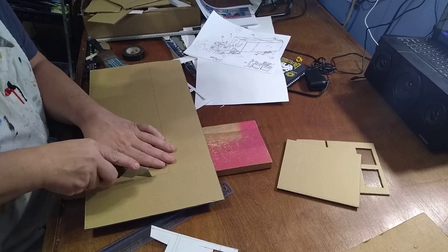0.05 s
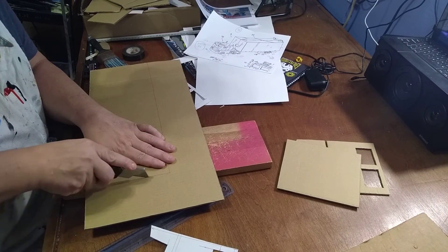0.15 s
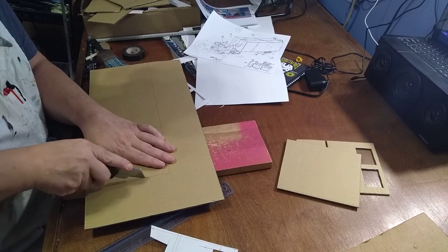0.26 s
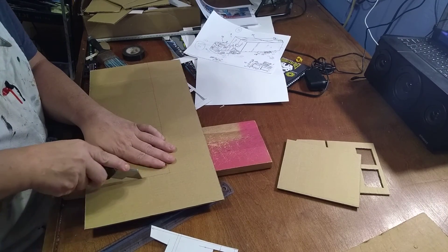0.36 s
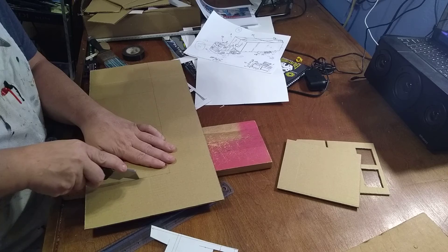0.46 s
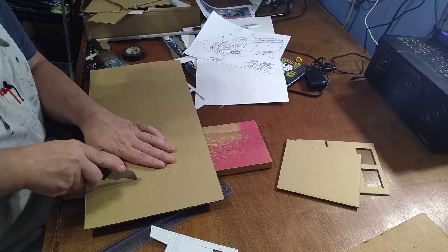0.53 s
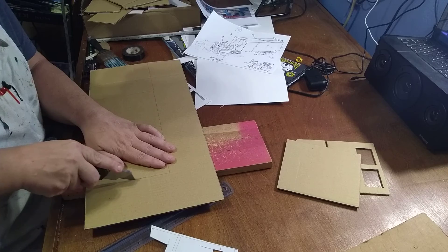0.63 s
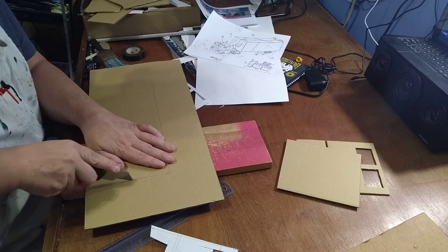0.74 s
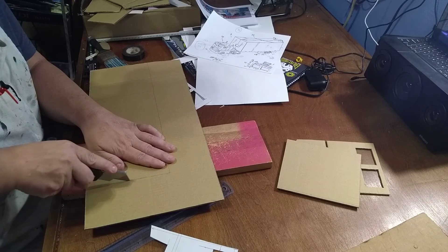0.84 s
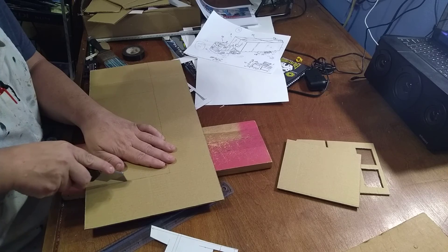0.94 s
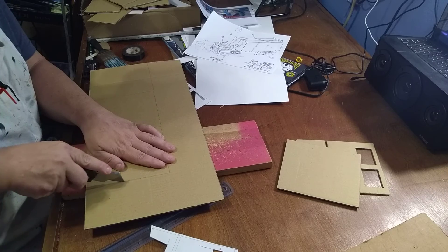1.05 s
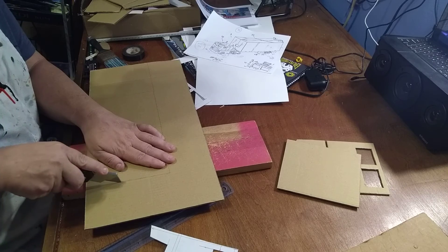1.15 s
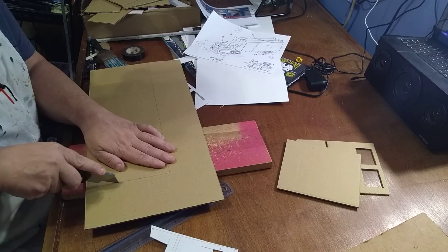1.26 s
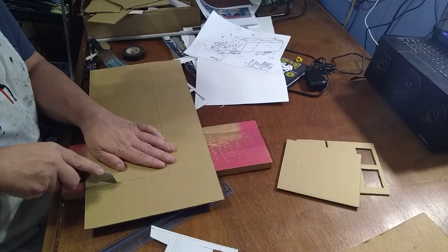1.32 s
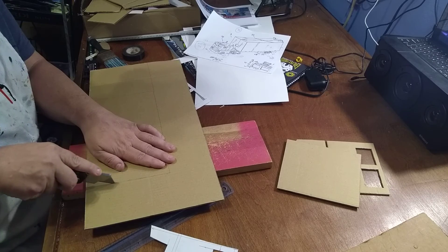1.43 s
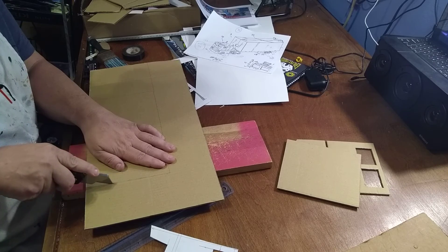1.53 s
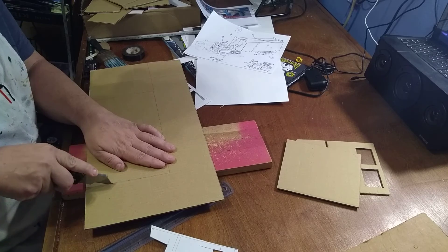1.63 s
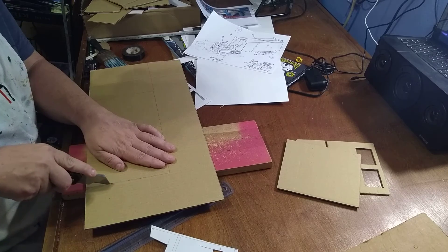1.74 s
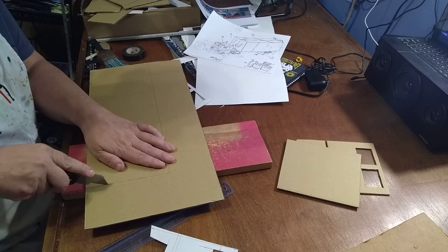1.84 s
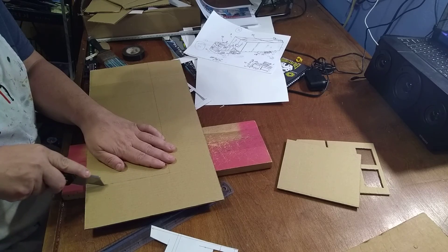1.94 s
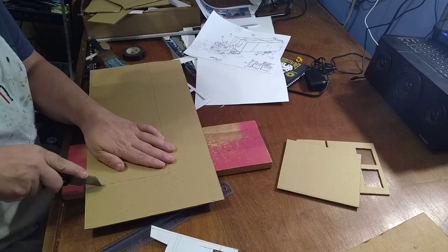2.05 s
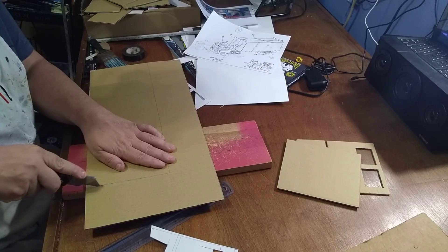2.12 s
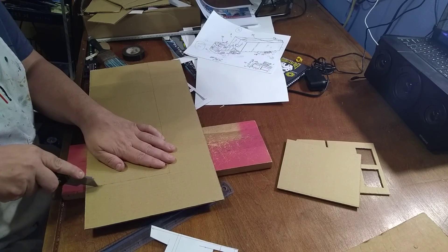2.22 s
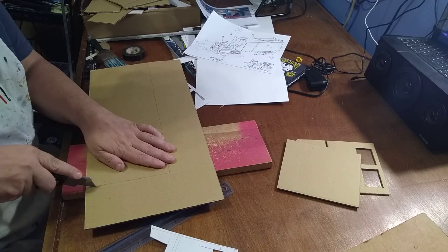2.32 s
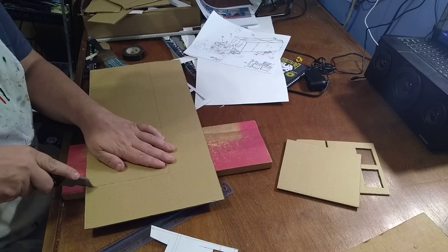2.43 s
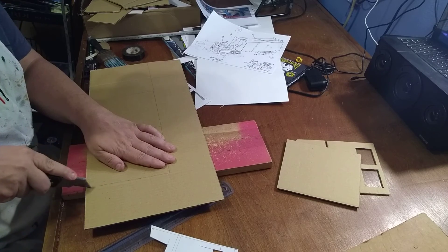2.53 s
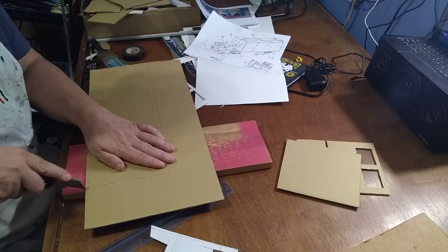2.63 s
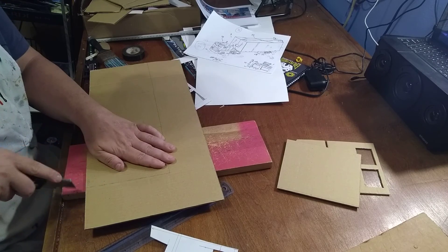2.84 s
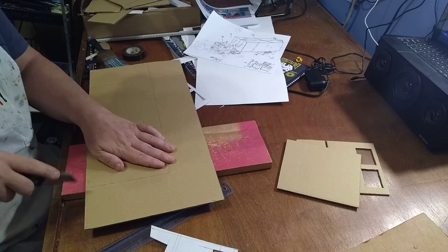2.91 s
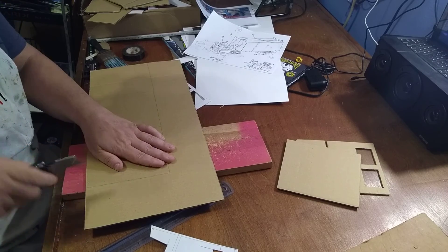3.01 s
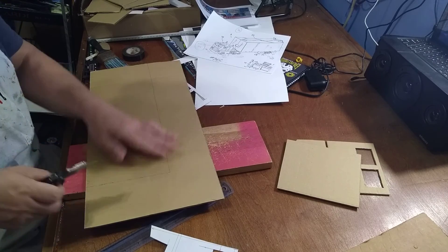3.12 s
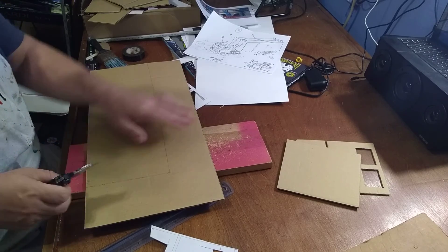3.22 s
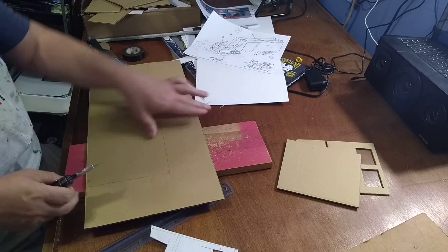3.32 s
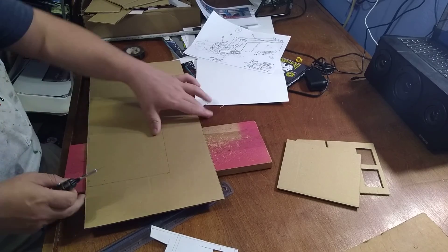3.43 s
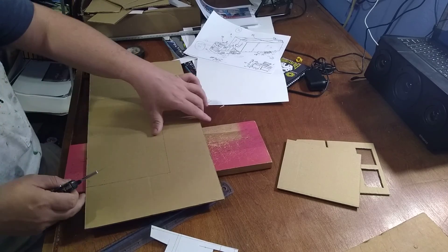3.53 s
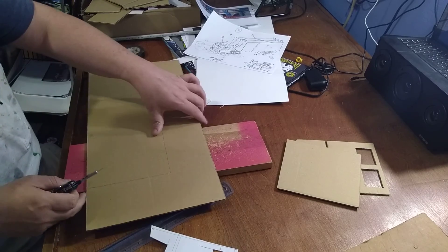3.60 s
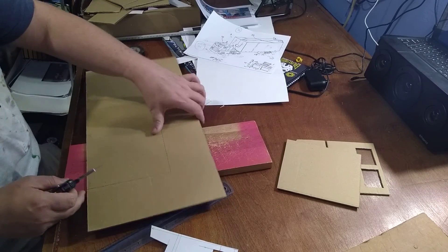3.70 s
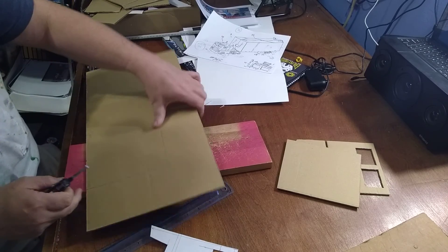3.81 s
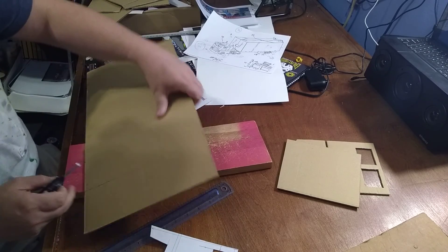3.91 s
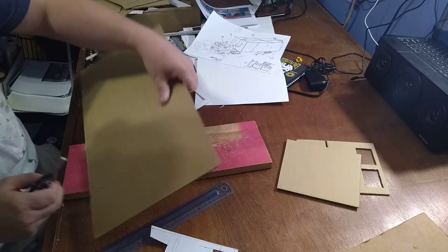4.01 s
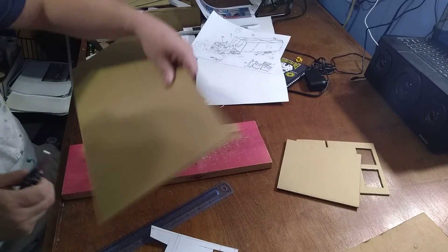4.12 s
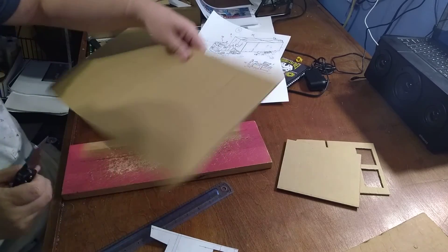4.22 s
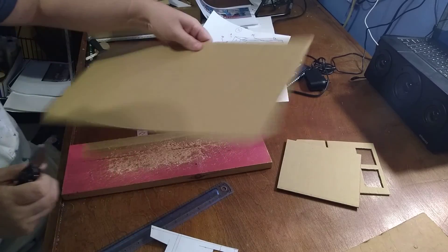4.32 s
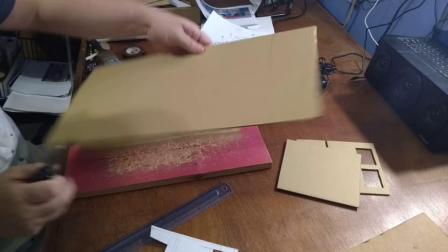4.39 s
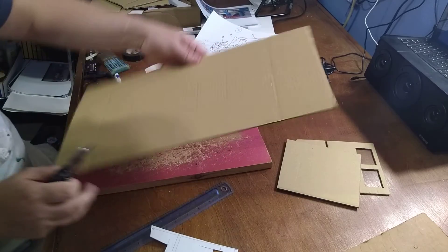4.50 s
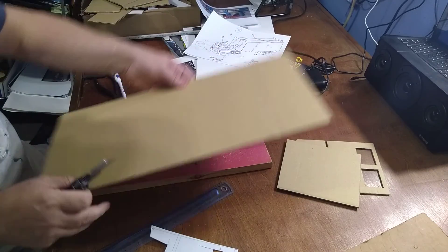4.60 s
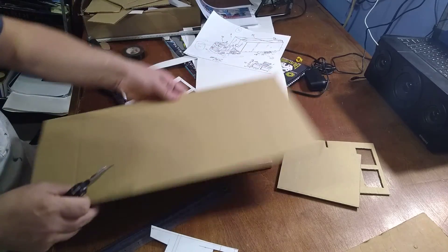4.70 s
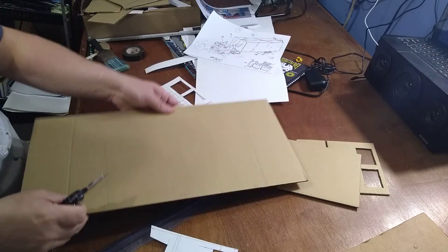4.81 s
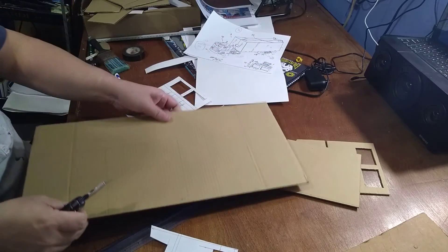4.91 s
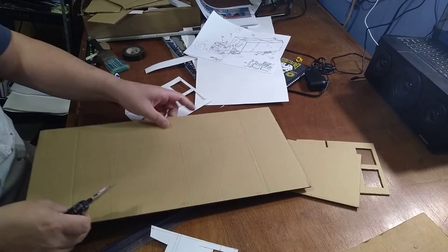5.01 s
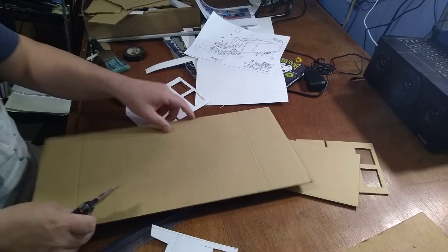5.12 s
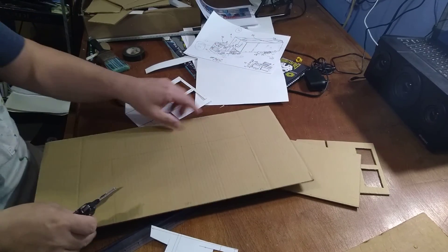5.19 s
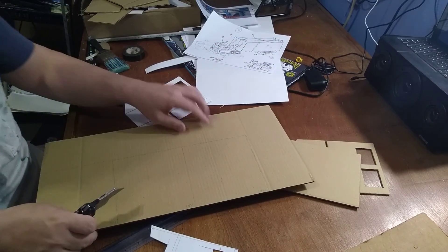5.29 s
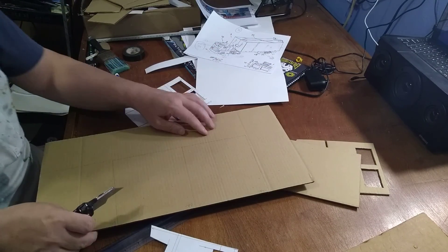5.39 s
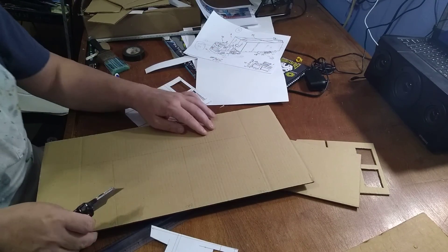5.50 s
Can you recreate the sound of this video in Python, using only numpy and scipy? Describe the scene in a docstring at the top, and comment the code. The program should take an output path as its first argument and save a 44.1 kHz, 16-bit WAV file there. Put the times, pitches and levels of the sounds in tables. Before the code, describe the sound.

A steady low fan noise with faint hum lies under everything in a small, briefly reverberant room, heard closely in wide phone stereo. From 0 to about 2.65 s a utility knife pulls through corrugated cardboard: a continuous dry rasp of snapping fibres, boxy midrange from the sheet, bright tearing hiss and a thin high blade ring, with uneven stick-slip effort, swelling near 1.9 s and again at the end. At 2.8 s the knife drops off the edge with small taps and a faint desk thud. Soft rubbing and ticks follow from 3.0 to 3.9 s; around 3.97 s the sheet is lifted with a stronger swish and knock. A scrape fades from 4.15 s, then scuffs, clustered hollow knocks and a crisp click come at 4.65-4.8 s. At 5.0 s the sheet lands with by far the loudest sound, a sharp flat crack and short boom, then small taps near 5.2 s and a faint slide at 5.55 s.

```python
"""Utility knife cutting cardboard

One long cut through a corrugated sheet on a desk: random fibre snaps drive sheet rasp, hiss and blade ring.
The knife drops off the edge; a hand slides over the sheet (shaped grain), picks it up, turns it and lays
it down with a sharp tap (push, tick, decaying modes, crunch; the desk booms as filtered noise).
Small room with changing noise tails, fan of air noise and hum sines, phone with a widened stereo image."""
import sys
import numpy as np
from scipy import signal
from scipy.fft import rfft, irfft
from scipy.io import wavfile
from scipy.ndimage import uniform_filter1d, map_coordinates

SR = 44100
rng = np.random.default_rng(int(sys.argv[2]) if len(sys.argv) > 2 else 0)


def inscribe(sig):
    """Save sig as 16-bit PCM at rate SR to the path in sys.argv[1].

    A 1-D sig is mono; a 2-D sig holds one channel per row.
    Samples are clipped to [-1, 1] before scaling.
    """
    pcm = np.round(np.clip(np.atleast_2d(sig).T, -1, 1) * 32767)
    wavfile.write(sys.argv[1], SR, pcm.astype(np.int16))


N = 244755

# modes of the free sheet: (frequency [Hz], relative level [dB], t60 [s])
SHEET_MODES = [(139.5, -24, 0.41), (224, -14.5, 0.24), (302, -33, 0.14), (371.7, -7, 0.16),
               (414, -8.5, 0.18), (469, -14, 0.14), (490, -12, 0.097), (601.7, 3.5, 0.1),
               (694, -2.5, 0.062), (828, -2.5, 0.077), (935, -5.5, 0.16), (1014, -5.5, 0.051),
               (1222, -1.5, 0.046), (1360, -12, 0.24), (1700, -19, 0.19)]
# colour of sliding hiss and dry ticks: (frequency [Hz], relative level [dB])
SWISH_COLOUR = [(600, -39), (2000, 24), (3500, 13), (5500, 11), (7500, 18.5), (10000, 20.5), (12300, 24.5),
                (13800, 20), (14500, 2.5)]


def amp(db):
    """Decibels to gain."""
    return 10 ** (np.asarray(db) / 20)


def unit(x):
    """x at rms 1."""
    return x / np.sqrt(np.mean(x ** 2) + 1e-20)


def along(points, hz):
    """(Hz, value) points read on a log frequency axis."""
    f, v = np.transpose(points)
    return np.interp(np.log(hz + 1), np.log(f), v)


def fade(t, t60):
    """Exponential decay, 60 dB in t60 seconds."""
    return np.exp(-np.log(1000) * t / t60)


def bell(hz, centre, width):
    """Resonance curve: 1 at its centre, 1/2 at the edges of its width."""
    return 1 / (1 + (2 * (hz - centre) / width) ** 2)


def wobble(rate):
    """Smooth random curve, rate knots a second."""
    knots = rng.standard_normal(int(N * rate / SR) + 4)
    return map_coordinates(knots, [np.arange(N) * rate / SR])


def shaped(x, gain):
    """x through the causal, minimum-phase filter with this gain over frequency."""
    size = 4096
    log_gain = np.log(np.maximum(gain(np.fft.rfftfreq(size, 1 / SR)), 1e-6))
    cepstrum = irfft(log_gain)
    # fold the cepstrum onto positive time: minimum phase
    cepstrum[1:size // 2] *= 2
    cepstrum[size // 2 + 1:] = 0
    impulse = irfft(np.exp(rfft(cepstrum)))
    return signal.fftconvolve(x, impulse[None], axes=1)[:, :x.shape[1]]


def coloured(x, spectrum):
    """x with the colour of (Hz, dB) points."""
    return shaped(x, lambda hz: amp(along(spectrum, hz)))


def patchy(x, depth_db):
    """Narrow bands flare and fade for a few hundredths of a second, alike on both paths."""
    z = signal.stft(x, nperseg=512)[2]
    field = rng.standard_normal(z.shape[1:])
    field = uniform_filter1d(field, size=4, axis=0)  # over frequency
    field = uniform_filter1d(field, size=7, axis=1)  # over time
    return signal.istft(z * amp(depth_db * unit(field)), nperseg=512)[1][:, :N]


def add(track, s, sound):
    """Mixes a sound into a track at time s."""
    part = track[:, round(s * SR):][:, :sound.shape[1]]
    part += sound[:, :part.shape[1]]


def fan():
    """Steady air noise with hum lines of fan and mains that waver in level and phase."""
    # hum lines: (frequency [Hz], rms level before wavering [dB])
    hum_lines = [(63, -60.5), (120, -63), (208, -69.5), (360, -60.5), (479, -61.5), (955, -65.5)]
    # air colour: (frequency [Hz], relative level [dB])
    air_colour = [(25, 1.5), (65, -1.5), (130, -6.5), (250, -4.5), (400, -6), (700, -10.5), (1000, -11.5),
                  (1600, -13.5), (3000, -15.5), (6000, -18.5), (9000, -23.5), (12300, -21.5),
                  (14500, -29.5)]
    air_db, hum_waver_db, phase_waver_rad = -49, 2.2, 1.27
    t = np.arange(N) / SR
    hum = 0
    for hz, db in hum_lines:
        level = amp(db + hum_waver_db * wobble(5.67)) * np.sqrt(2)
        phase = phase_waver_rad * np.array([wobble(7), wobble(7)])
        hum = hum + level * np.sin(2 * np.pi * hz * t + phase)
    air = patchy(rng.standard_normal((2, N)), depth_db=3)
    return hum + amp(air_db) * unit(coloured(air, air_colour))


def room(x):
    """Walls answer after 5 ms, treble dies first; moving arms and sheet keep changing the echo paths."""
    # reverberation: (frequency [Hz], t60 [s])
    reverb_t60 = [(150, 0.37), (600, 0.43), (3000, 0.32), (12000, 0.22)]
    delay_s = 0.005
    hz, t, z = signal.stft(rng.standard_normal((4, 2, SR // 2)), SR, nperseg=256)
    decay = fade(t, along(reverb_t60, hz)[:, None])
    tails = signal.istft(z * decay, SR, nperseg=256)[1]
    tails = tails / np.linalg.norm(tails[0, 0])
    tails = np.pad(tails, ((0, 0), (0, 0), (round(delay_s * SR), 0)))
    # drifting mix of four tails at constant total power
    shares = np.array([wobble(1.957) for _ in tails])
    shares /= np.linalg.norm(shares, axis=0)
    echoes = signal.fftconvolve(x[None], tails, axes=2)[..., :N]
    return (shares[:, None] * echoes).sum(0)


def thump():
    """Desk booms briefly: low noise that swells and decays."""
    # knife drops off, sheet is tipped, sheet lands: (time [s], level before the envelope [dB])
    desk_hits = [(2.835, -52), (3.965, -52), (4.9988, -40)]
    # boom colour: (frequency [Hz], relative level [dB])
    boom_colour = [(25, -21), (65, -8), (140, -3), (230, -9), (500, -13), (2000, -75)]
    t = np.arange(N) / SR
    boom = 0
    for s, db in desk_hits:
        since = np.maximum(t - s, 0)
        boom = boom + amp(db) * (1 - fade(since, 0.05)) * fade(since, 0.77)
    return boom * unit(coloured(rng.standard_normal((2, N)), boom_colour))


def snaps(rate):
    """Fibres breaking at random moments and sizes, each reaching the two sound paths differently."""
    breaks = rng.random(N) < rate / SR
    return unit(breaks * rng.standard_normal((2, N)))


def grain():
    """Dense stream of fine fibres plus the crackle of coarser bundles."""
    bundles_per_s, bundle_db = 300, -6  # level against the fine grain
    return snaps(rate=14000) + amp(bundle_db) * snaps(rate=bundles_per_s)


def handling():
    """Skin and desk rub the sheet: smooth slides, and short scrapes that swell and die."""
    # slides: (peak time [s], half width at 1/e [s], sheet rasp [dB], hiss [dB])
    slides = [(2.73, 0.098, -47, -66), (3.06, 0.092, -54, -47), (3.6, 0.15, -51, -54),
              (3.805, 0.035, -42.5, -55), (3.94, 0.11, -42.5, -39), (3.976, 0.041, -33.5, -35),
              (4.32, 0.23, -53.5, -46), (4.57, 0.061, -49, -56.5), (4.89, 0.026, -51, -45),
              (4.965, 0.051, -43.5, -41.5), (5.55, .05, -53.5, -51.5)]
    # scrapes: (time [s], t60 [s], sheet rasp [dB], hiss [dB])
    scuffs = [(2.832, 0.2, -41, -67), (3.067, 0.38, -47, -53), (3.142, 0.071, -42.5, -47),
              (3.358, 0.31, -55, -43.5), (3.707, 0.09, -41.5, -37), (3.853, 0.088, -51, -52),
              (4.158, 0.69, -52.5, -42.5), (4.643, 0.14, -34.5, -35.5), (4.756, 0.13, -35, -39),
              (5.152, 0.052, -44, -54), (5.32, 1, -64, -56)]
    # colour of the rubbed sheet: (frequency [Hz], relative level [dB])
    rub_colour = [(50, -55), (150, -16), (300, 2.5), (450, -1.5), (620, 1), (800, 5), (1000, 5), (1300, 2),
                  (1900, 2.5), (3000, -3), (5000, -2.5), (9000, -10.5)]
    scuff_rise_s, rub_flutter_db = 0.02, 1.3
    t = np.arange(N) / SR
    strokes = []
    for s, width_s, rasp_db, hiss_db in slides:
        strokes.append((np.exp(-((t - s) / width_s) ** 2), rasp_db, hiss_db))
    for s, t60, rasp_db, hiss_db in scuffs:
        rise = np.sqrt(np.clip((t - s) / scuff_rise_s, 0, 1))
        decay = fade(np.maximum(t - s - scuff_rise_s, 0), t60)
        strokes.append((rise * decay, rasp_db, hiss_db))
    # overlapping strokes add in power
    rasp = np.sqrt(sum((amp(db) * stroke) ** 2 for stroke, db, _ in strokes))
    hiss = np.sqrt(sum((amp(db) * stroke) ** 2 for stroke, _, db in strokes))
    fibres = patchy(grain() * amp(rub_flutter_db * wobble(80)), depth_db=3.5)
    lift_db, width_hz = 8, 40  # rubbing also stirs the sheet modes; lift scales with mode level

    def mode_gain(hz):
        return amp(lift_db * sum(amp(db / 2) * bell(hz, f, width_hz) for f, db, _ in SHEET_MODES))

    sheet = unit(coloured(shaped(fibres, mode_gain), rub_colour))
    return rasp * sheet + hiss * unit(coloured(fibres, SWISH_COLOUR))


def levelled(x):
    """x with each path at rms 1 over its first 25 ms."""
    start = x[:, :np.count_nonzero(np.arange(x.shape[1]) / SR < .025)]
    return x / np.sqrt(np.mean(start ** 2, axis=1, keepdims=True))


def knocks():
    """Contact: sharp push, dry tick, brief sheet ring, crunch of the flexing liner; click: tick alone."""
    # contacts of knife, fingers and sheet, levels relative: (time [s], sheet ring [dB], sharp push [dB],
    # brightness of the ring [dB per octave], frequency the contact point favours [Hz])
    contacts = [(0.281, -42, -42, -0.5, 1010), (2.630, -38, -52, 5, 1110), (2.646, -35.5, -41, 0, 436),
                (2.700, -41.5, -48, -9.5, 450), (2.835, -38.5, -34, -2.5, 520), (2.8445, -48, -36, 7, 950),
                (2.852, -45.5, -26, 3, 705), (3.0325, -46.5, -33, 12.5, 1450),
                (3.076, -45.5, -32, 17, 3160), (3.158, -45, -47, 5, 1570), (3.7015, -40, -33, 3.5, 1060),
                (3.722, -41, -36, 0.5, 1222), (3.868, -40, -46, -0.5, 1222), (3.972, -34, -24, -1, 890),
                (3.987, -41.5, -21, 7, 1100), (4.428, -49.5, -52, 7.5, 1222), (4.649, -34.5, -41, 0.5, 920),
                (4.661, -35.5, -36, 3, 1000), (4.671, -36, -38, 0, 1400), (4.680, -33, -31, 1.5, 420),
                (4.692, -35.5, -31, -0.5, 577), (4.769, -38, -40, -1, 650), (4.777, -38.5, -44, -2.5, 1000),
                (4.799, -38, -45, 3.5, 1030), (4.948, -45, -45, 9, 1222), (4.9987, -29.5, 1.8, 4.5, 1222),
                (5.006, -26.5, -25, -1, 550), (5.045, -39.5, -40, 0, 1390), (5.1694, -39.5, -40, 1.5, 800),
                (5.188, -39.5, -45, -5, 554), (5.2238, -41, -28.5, 2.5, 1550), (5.231, -38.5, -36, -5, 434)]
    # a hard edge or fingernail catches: (time [s], level [dB])
    clicks = [(0.248, -30), (2.883, -33), (3.033, -40.5), (3.702, -26), (4.16, -34), (4.6615, -15)]
    # colours of push and crunch: (frequency [Hz], relative level [dB])
    push_colour = [(60, -29), (300, -5), (700, 1.5), (1300, 1.5), (2000, 7), (3000, 1.5), (4200, -6.5),
                   (5500, -10.5), (8000, -47), (14000, -23)]
    crunch_colour = [(80, -38), (350, 4), (1400, -1), (3500, -13), (6500, -40.5)]
    ring_attack_t60_s = 0.0043  # cardboard gives way before it rings
    tick_db, crunch_db = -10, -1.5  # against the ring
    tick_t60_s, crunch_t60_s = 0.016, 0.059
    favour_db, favour_octaves = 10.5, 0.29  # lift of the favoured modes and its width
    track, t = np.zeros((2, N)), np.arange(SR // 2) / SR
    push = coloured(np.array([t == 0], float), push_colour)
    push = push / np.abs(push).max() * [[1.3], [-.25]]  # mostly from straight ahead

    def burst(spectrum):
        return unit(coloured(rng.standard_normal((2, len(t))), spectrum))

    def tick():
        return burst(SWISH_COLOUR) * fade(t, tick_t60_s)

    hz, level_db, t60 = np.transpose(SHEET_MODES)[:, :, None]
    for s, ring_db, push_db, tilt_db, favoured_hz in contacts:
        def contact_db(f):
            favour = favour_db * bell(np.log2(f), np.log2(favoured_hz), favour_octaves)
            return favour + tilt_db * np.log2(f / favoured_hz)

        strength = amp(level_db + contact_db(hz) + 2 * rng.standard_normal((2, len(SHEET_MODES), 1)))
        phase = 2 * np.pi * rng.random((2, len(SHEET_MODES), 1))
        bent_hz = hz * (1 + 0.0077 * rng.standard_normal(hz.shape))  # grip and bending shift the modes
        ring = (strength * np.sin(2 * np.pi * bent_hz * t + phase) * fade(t, t60)).sum(1)
        crunch = shaped(burst(crunch_colour), lambda f: amp(contact_db(np.clip(f, 150, 4000))))
        crunch = crunch * fade(t, crunch_t60_s)
        body = levelled(ring) + amp(crunch_db) * levelled(crunch)
        body = levelled(body * (1 - fade(t, ring_attack_t60_s)))
        add(track, s, amp(push_db) * push + amp(ring_db) * (body + amp(tick_db) * tick()))
    for s, db in clicks:
        add(track, s, amp(db) * tick())
    # contacts carry no deep bass
    return signal.sosfilt(signal.butter(2, 90, "highpass", fs=SR, output="sos"), track)


def pressed(x):
    """The held sheet's resonances drift between slacker and tauter as the hand's pressure changes."""
    # resonances of the pressed sheet: (centre before shift [Hz], width [Hz], lift [dB])
    held_modes = [(216, 43, 7), (379, 50, 14), (421, 19, 6), (461, 32, 9), (620, 61, 2), (960, 18, 9),
                  (1202, 76, 11.5), (1336, 23, 8.5), (1443, 59, 3.5), (1575, 97, 6.5)]
    shift, shifts_per_s = 0.028, 7.7  # frequency fraction either way; random knots a second

    def state(ratio):
        return shaped(x, lambda hz: amp(sum(db * bell(hz, ratio * f, w) for f, w, db in held_modes)))

    taut = (1 + np.tanh(2 * wobble(shifts_per_s))) / 2
    return (1 - taut) * state(1 - shift) + taut * state(1 + shift)


def cut():
    """Snapping fibres shake the sheet, hiss and ring the thin blade; hiss and ring follow effort."""
    # pull of the blade through the sheet: (time [s], effort [dB])
    effort_points = [(0.0, -43), (0.135, -43), (0.16, -39.5), (0.29, -38), (0.43, -42), (.66, -39.5),
                     (.71, -45), (.76, -40), (1.03, -37), (1.12, -41.5), (1.53, -39.5), (1.61, -48),
                     (1.84, -43), (1.91, -32.5), (2.02, -37.5), (2.085, -50), (2.1, -43.5), (2.44, -37),
                     (2.53, -43), (2.57, -33.5), (2.62, -36), (2.63, -30), (2.69, -80), (2.76, -71)]
    # shaking of the sheet under the blade: (time [s], level [dB])
    shaking = [(0.01, -42), (0.13, -45), (0.26, -41.5), (0.55, -43.5), (0.64, -40.5), (0.7, -43.5),
               (0.98, -38), (1.11, -41), (1.56, -40.5), (1.59, -47), (1.96, -37), (2.1, -43), (2.24, -43),
               (2.26, -40), (2.53, -44), (2.56, -39), (2.63, -37.5)]
    # blade breaks through tougher spots: (time [s], extra force [dB])
    snags = [(0.247, 4), (2.011, 1), (2.097, 5), (2.263, 6)]
    # colours of sheet and tearing: (frequency [Hz], relative level [dB])
    rasp_colour = [(40, -32), (130, -7), (290, -6.5), (390, -4.5), (650, 2.1), (830, -4.5), (1080, -7.5),
                   (1300, -3), (1700, -1), (2200, -8), (3200, -8), (6000, -54)]
    fibre_colour = [(500, -45), (2000, -14), (3200, -3), (4300, 7.5), (5800, 5), (7500, 7), (9000, 4.5),
                    (11000, 12.5), (13000, 13.5), (14300, -6)]
    cut_s, rasp_release_t60_s, snag_t60_s = 2.61, 0.25, 0.08
    usual_effort_db = -40
    hiss_base_db, hiss_growth = -38.5, 1  # level at usual effort; dB per dB of effort
    blade_base_db, blade_growth = -46.5, 0.74  # likewise, at mid-cut
    blade_rise_db_per_s, blade_flutter_db = 3.5, 4
    dull_s, dull_width_s, dull_depth_db = 1.69, 0.21, -37  # a stretch where the blade sings less
    catches_per_s, catch_db = 55, 1.3  # stick-slip: centre of a wandering rate; depth
    blade_hz, blade_width_hz = 12250, 1100

    t = np.arange(N) / SR
    effort_db = np.interp(t, *np.transpose(effort_points), right=-200) - usual_effort_db
    release = fade(np.maximum(t - cut_s, 0), rasp_release_t60_s)
    rasp = amp(np.interp(t, *np.transpose(shaking))) * release
    hiss = amp(hiss_base_db + hiss_growth * effort_db)
    dull_db = dull_depth_db * np.exp(-((t - dull_s) / dull_width_s) ** 2)
    ring_db = blade_base_db + blade_growth * effort_db + blade_rise_db_per_s * (t - cut_s / 2)
    ring = amp(ring_db + dull_db + blade_flutter_db * wobble(90))
    snag = amp(sum(db * (t >= s) * fade(np.abs(t - s), snag_t60_s) for s, db in snags))

    catch_cycles = np.cumsum(catches_per_s * amp(2.01 * wobble(20))) / SR
    force = amp(catch_db * np.sin(2 * np.pi * catch_cycles))
    fibres = patchy(force * grain(), depth_db=2)
    sheet = unit(coloured(pressed(fibres), rasp_colour))
    tearing = unit(coloured(fibres, fibre_colour))
    blade = unit(shaped(fibres, lambda hz: bell(hz, blade_hz, blade_width_hz)))
    return rasp * sheet + snag * (hiss * tearing + ring * blade)


def scene():
    """Two sound paths reach the phone: from the front and from the sides."""
    friction, contacts = cut() + handling(), knocks()
    # the cluttered room swallows most of the crack
    dull = coloured(contacts, [(1300, -11.0), (3000, -17.5), (9000, -3.5)])
    return friction + contacts + thump() + room(amp(-4.0) * friction + dull) + fan()


def record(dry):
    """The phone combs front and side sound into a wide stereo pair, caps peaks and cuts the top."""
    # image swings along frequency: (frequency [Hz], width [0 centre to 1 sides])
    image_width = [(25, .94), (120, .58), (400, .31), (800, .28), (1130, 0), (1800, .56), (2170, 1),
                   (2500, 1), (2850, .56), (3330, 0), (3530, 0), (4000, .42), (4480, .99), (4760, .99),
                   (5750, .12), (6900, .58), (10000, .47), (11200, .6), (12200, .33), (13400, .52)]
    top_hz = 14450
    f, width = np.transpose(image_width)

    def angle(hz):
        return np.pi / 2 * np.clip(np.interp(hz, f, width), .004, .996)

    mid = shaped(dry[:1], lambda hz: np.cos(angle(hz)))[0]
    side = shaped(dry[1:], lambda hz: np.sin(angle(hz)))[0]
    pair = np.clip([mid + side, mid - side], -.9, .9)
    low_pass = signal.firwin(301, top_hz, fs=SR)
    return signal.fftconvolve(pair, low_pass[None], mode="same", axes=1)


dry = scene()
out = record(dry)
inscribe(out)
```